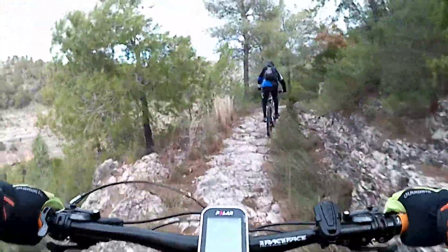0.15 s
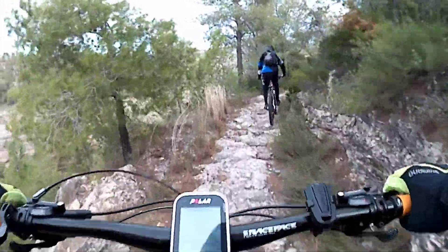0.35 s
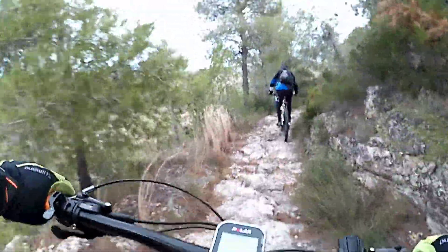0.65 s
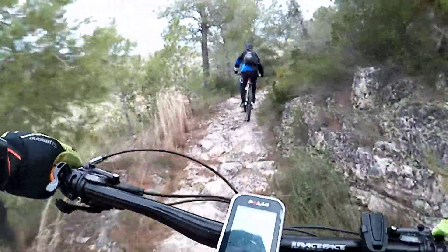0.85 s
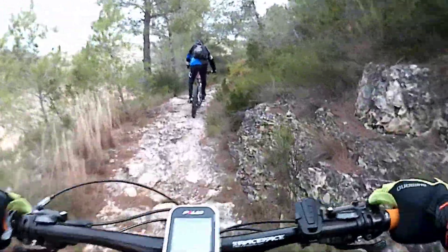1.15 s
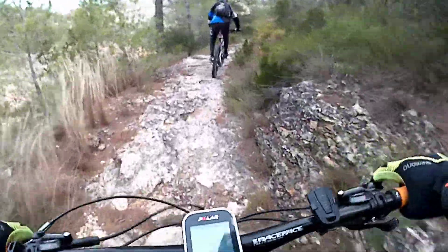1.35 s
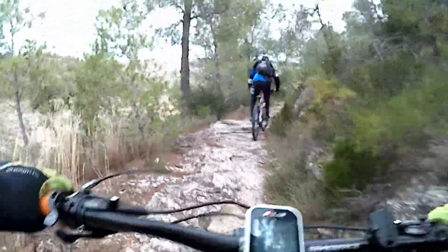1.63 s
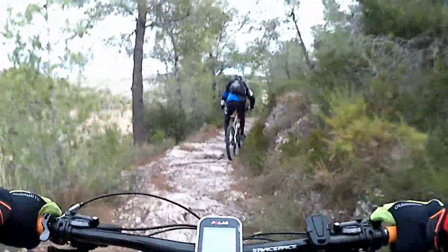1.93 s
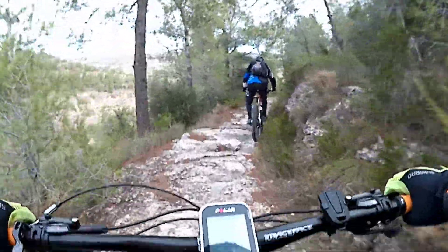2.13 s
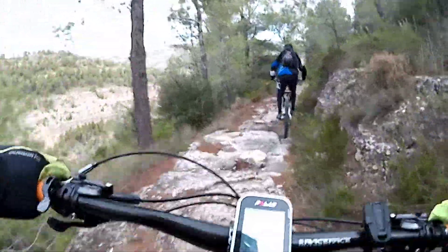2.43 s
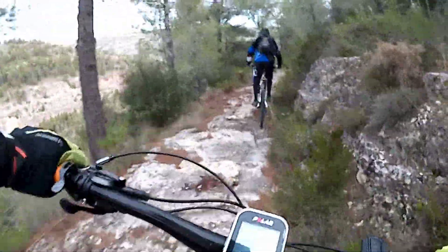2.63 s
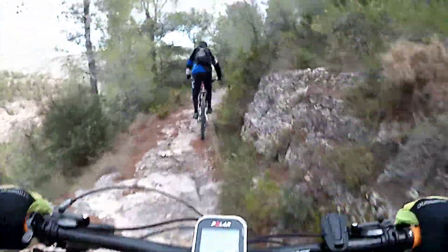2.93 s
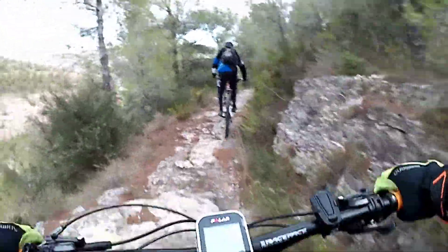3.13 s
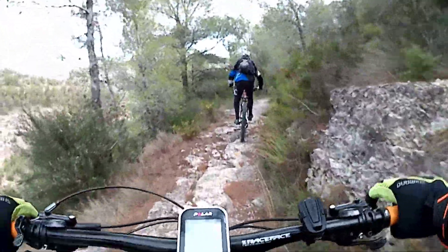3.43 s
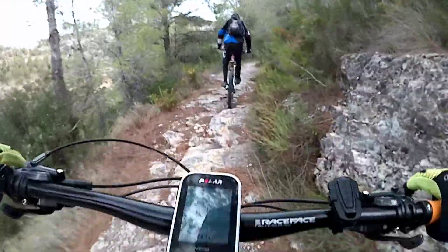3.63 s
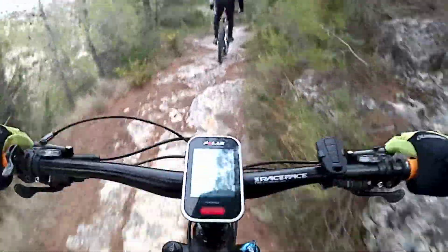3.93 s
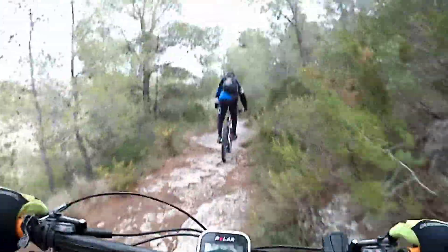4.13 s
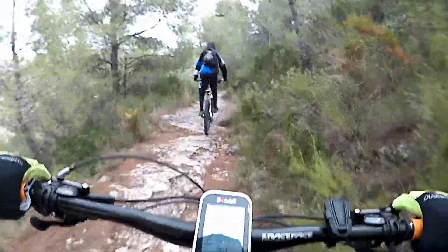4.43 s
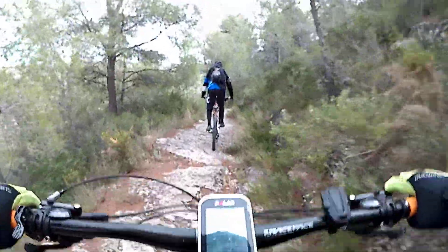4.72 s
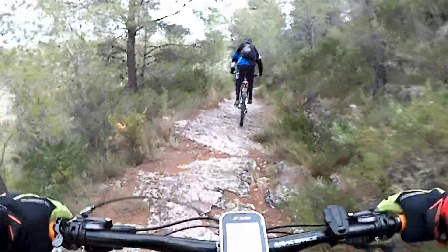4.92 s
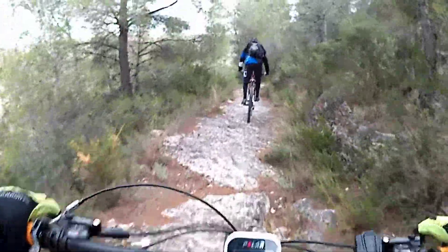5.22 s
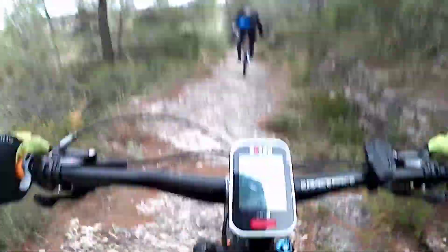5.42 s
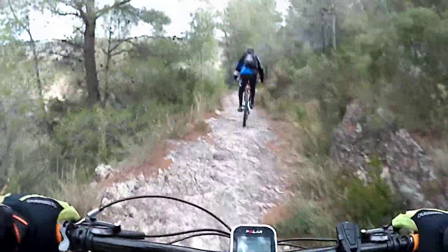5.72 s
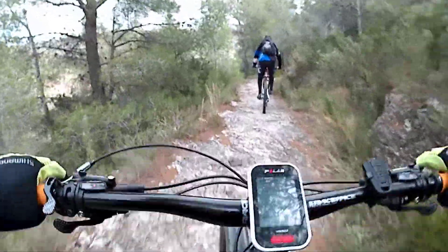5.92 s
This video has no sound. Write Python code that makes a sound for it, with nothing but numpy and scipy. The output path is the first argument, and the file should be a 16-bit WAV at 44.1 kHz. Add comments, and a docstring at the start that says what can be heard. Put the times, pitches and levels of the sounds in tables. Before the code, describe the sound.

A mountain bike rolls along a rocky trail outdoors, heard close up from a muffled microphone on the rider's chest. Rocks knock against the bike in quick, uneven succession, some blows ringing with a hollow note. Deep thumps jolt the microphone, and the chain and cables slap and rattle in short bursts. Underneath, the tyres crunch over grit and wind rumbles throughout.

```python
"""Rocks knock on a mountain bike rolling down a trail, heard from a camera on the rider's chest.
Each blow chatters and rings the frame; hollow notes sound alone or on a knock. Ground jolts shove
the camera into deep thumps, and the hardest overload it. Chain and cables slap and rattle in bursts.
Underneath, knobby tyres crunch over grit and hum on rock, and wind rumbles on the microphone."""
import sys
import numpy as np
from scipy import signal
from scipy.fft import rfft, irfft, next_fast_len
from scipy.io import wavfile
from scipy.ndimage import uniform_filter1d

SR = 44100
rng = np.random.default_rng(int(sys.argv[2]) if len(sys.argv) > 2 else 0)


def wav_out(sig):
    """Save sig, one row per channel (or a flat mono array), as 16-bit PCM at SR to the path in sys.argv[1]."""
    wavfile.write(sys.argv[1], SR, np.round(np.clip(np.atleast_2d(sig).T, -1, 1) * 32767).astype(np.int16))


N = 267554
TIME = np.arange(N) / SR
GRIT_REF_DB = -38


def undb(db):
    """Decibels to gain."""
    return 10 ** (np.asarray(db) / 20)


def unit(x):
    """Scale to rms 1."""
    return x / np.sqrt(np.mean(x ** 2))


def add(track, at_s, sound):
    """Mix a sound into the track."""
    start = max(int(at_s * SR), 0)
    part = sound[:max(N - start, 0)]
    track[start:start + len(part)] += part


def curve(points):
    """Interpolate (t/s, value) points to every sample."""
    return np.interp(TIME, *np.transpose(points))


def walk(rate_hz):
    """Smoothed random steps, spread near 1."""
    hold = int(SR / rate_hz)
    steps = rng.standard_normal(2048)[np.arange(N) // hold % 2048]
    return 1.3 * uniform_filter1d(uniform_filter1d(steps, hold), hold)


def colour(x, spectrum):
    """Shape by (f/Hz, level/dB) points, cut outside them; rms 1."""
    hz, db = np.transpose(spectrum)
    size = next_fast_len(N)
    bins_hz = np.maximum(np.fft.rfftfreq(size, 1 / SR), 1)
    gain = undb(np.interp(np.log(bins_hz), np.log(hz), db, left=-90, right=-90))
    return unit(irfft(rfft(x, size) * gain, size)[:N])


def resonate(x, modes):
    """Ring damped modes, band-limited to their range."""
    ringing = sum((-1) ** k * undb(db) * signal.lfilter(*signal.iirpeak(hz, hz / width_hz, fs=SR), x)
                  for k, (hz, width_hz, db) in enumerate(modes))
    edges_hz = [max(modes[0][0] - modes[0][1], 20), modes[-1][0] + modes[-1][1]]
    return signal.lfilter(*signal.butter(2, edges_hz, "bandpass", fs=SR), ringing)


def ring_each(forces, modes, spread=0.1):
    """Ring the modes once per blow; the place struck shifts their pitch."""
    tunings = np.exp(np.clip(spread * rng.standard_normal((len(forces), len(modes))), -.3, .3))
    return np.array([resonate(force, [(hz * k, width, db) for (hz, width, db), k in zip(modes, tuning)])
                     for force, tuning in zip(forces, tunings)])


def set_attack(x, db):
    """Set each blow's rms level over its first 12 ms."""
    head = x[..., :int(.012 * SR)]
    return x * undb(db) / np.sqrt(np.mean(head ** 2, axis=-1, keepdims=True))


# Modes of bar, frame and camera case: f/Hz, width/Hz, level/dB
THUD_MODES = [(98, 33, 0), (234, 197, -4.5), (300.6, 129.5, -2)]
BODY_MODES = [(484, 106, -0.5), (691, 40, 2.5), (922, 320, 2.5), (1233, 240, -7)]
CLACK_MODES = [(1589, 450, -2), (1876, 113, 3.5), (2043, 527, -3.5)]
TICK_MODES = [(2456, 350, 8), (3453, 570, 2.5), (4050, 32, -14)]
# Rock blows: t/s, level/dB, ring f/Hz, relative thud/dB, relative clatter/dB
ROCK_BLOWS = [(0.025, -29, 1080, -6, 0.5), (0.0727, -26, 925, -31, -2), (0.1028, -27.5, 1100, -24, -2.5),
              (0.1983, -26, 840, 5, -5), (0.2313, -22, 696, -2, -12), (0.2612, -17, 1280, 0, -3),
              (0.3098, -20.5, 1140, -30, -4), (0.4956, -21, 790, 4, -7), (0.5692, -18, 1010, -10, -2.5),
              (0.605, -26.5, 870, -15, -6), (0.7618, -20.5, 1020, -6.5, -0.5),
              (0.902, -21.5, 1050, 0, -4.5), (1.0102, -22, 1110, 2.5, -13), (1.0402, -23, 1504, -8, -6),
              (1.0634, -23, 1075, 6, -0.5), (1.0946, -23.5, 995, -16, -2), (1.1451, -23, 970, -21, -5.5),
              (1.195, -22.5, 500, -2, -8.5), (1.2112, -18, 1140, 4.5, -1.5), (1.2544, -20, 1240, -7, -8),
              (1.3025, -24, 1460, 3, -9), (1.377, -28.5, 1860, -19, -6), (1.398, -28, 900, -18, -3.5),
              (1.4375, -19.5, 720, -37, -11), (1.4761, -22, 582, -2, -7.5), (1.5401, -12.5, 800, -22, -6.5),
              (1.5863, -17.5, 1200, -13, -6.5), (1.7753, -22.5, 1037, 0.5, -2),
              (1.7933, -19, 940, -23, -1.5), (1.923, -30.5, 1720, 3, -11), (1.9429, -20, 1124, -9, -35),
              (2.0247, -20, 860, -3, -9.5), (2.161, -18, 1230, -16, -20), (2.2179, -15, 790, -5.5, -8),
              (2.3019, -24, 557, 5, -7.5), (2.3336, -30, 1020, -12, -0.5), (2.3699, -26, 1170, -29, -14),
              (2.4306, -9, 1230, -13, -6.5), (2.4801, -20, 543, -4, -10), (2.6875, -25, 720, -14, -46),
              (2.9595, -21, 1050, -4, -5.5), (3.062, -21.5, 660, 5, -1.5), (3.0675, -15.5, 900, -4.5, -2),
              (3.117, -32.5, 1210, -1, 0.5), (3.2204, -14.5, 1200, 0, -5), (3.24, -22.5, 1140, -22, -1),
              (3.358, -32.5, 1110, 12.5, -11), (3.4223, -20.5, 840, -8, -1), (3.4746, -25, 1084, -4, -4),
              (3.631, -29.5, 890, -9, -10), (3.6801, -25, 1716, 9, -4.5), (3.713, -22, 920, -3, -9),
              (3.728, -28.5, 970, 9, 1), (3.741, -22.5, 660, 11, -10), (3.757, -26, 800, 7, -18),
              (3.8093, -25, 720, -18, -8), (3.918, -20, 870, -9, -22), (4.0054, -16.5, 782, 2, -5),
              (4.0842, -20, 630, -10.5, -0.5), (4.1334, -20, 1480, -12, 0), (4.18, -27, 1320, 3.5, -2),
              (4.2612, -14, 940, -5.5, -8), (4.2632, -16, 1690, -16.5, -2.5), (4.4121, -16, 740, 0, -3),
              (4.6135, -19.5, 1110, -3, -2.5), (4.6629, -28, 1000, 6.5, -3.5), (4.803, -26, 1030, 3, -6.5),
              (4.8835, -26, 1050, -4, 0.5), (4.9375, -18.5, 1510, -18, -6.5), (5.1576, -21, 946, 3, -3),
              (5.1851, -20.5, 502, -18, -9.5), (5.2285, -21, 1020, 3.5, -2.5),
              (5.2733, -19.5, 870, -12, -12), (5.291, -32, 1070, -9, 1), (5.3099, -21.5, 920, -3, -22),
              (5.4444, -19.5, 1400, 9.5, 0.5), (5.51, -28.5, 1150, -6, -7), (5.6379, -19.5, 1204, -2, -1),
              (5.705, -29, 1076, 12, -9), (5.79, -30, 850, 6.5, -4.5), (5.9432, -19, 1080, -6, -4.5),
              (6.0067, -26, 1110, 9, -3), (6.0549, -20.5, 1090, -21, 0.5)]


def knocks(rows, grit_db, rise_s=0.00024, chatter=0.87, tail_db=-23, tail_t60_s=0.11):
    """Hard contacts build, chatter, ring the bike and leave a faint rattle."""
    times_s, db, hz, thud_db, clatter_db = np.transpose(rows)[:, :, None]
    excess_db = np.interp(times_s, TIME, grit_db) - GRIT_REF_DB
    t60_s = 0.02 * (1050 / hz) ** 0.15 * undb(excess_db)  # longer on low notes and in loud grit
    t = TIME[:SR // 10]
    grain, size, scrape = rng.standard_normal((len(rows), 3, len(t))).transpose(1, 0, 2)
    rise = 1 - np.exp(-t / rise_s)
    fade = undb(-60 * t / np.maximum(t60_s, .004))
    tail = undb(tail_db - 60 * t / tail_t60_s)
    contact = grain * np.exp(chatter * size)
    force = rise * (contact * fade + scrape * tail)
    first_touch = (t == 0) * np.sqrt(np.sum(force ** 2, axis=1, keepdims=True))
    note = set_attack(np.sin(2 * np.pi * hz * t) * rise * fade, 0)
    frame = set_attack(ring_each(force + first_touch, BODY_MODES), 0)
    note_share = np.clip(0.49 - 0.05 * (db + 22), 0, 1)  # softer blows ring more purely
    body = set_attack(np.sqrt(note_share) * note + np.sqrt(1 - note_share) * frame, db + 1)
    thud = set_attack(resonate(force + undb(2.5) * first_touch, THUD_MODES), db + thud_db - 1)
    clack = set_attack(ring_each(force, CLACK_MODES), db + clatter_db)
    tick = set_attack(ring_each(force, TICK_MODES), db + clatter_db - 8)
    out = np.zeros(N)
    for at_s, blow in zip(times_s[:, 0], body + thud + clack + tick):
        add(out, at_s, blow)
    return out


def loose_stones(grit_db, per_s=7, ref_level_db=-39, ring_hz=950, thud_db=-3, clatter_db=-3):
    """Loose stones knock lightly at random, following the level of the grit."""
    count = int(per_s * N / SR)
    times_s = rng.uniform(0, N / SR, count)
    notes_hz = ring_hz * np.exp(0.31 * rng.standard_normal(count))
    excess_db = np.interp(times_s, TIME, grit_db) - GRIT_REF_DB
    rows = [(at_s, db, hz, thud_db, clatter_db)
            for at_s, db, hz in zip(times_s, ref_level_db + excess_db, notes_hz)]
    return knocks(rows, grit_db)


# Hollow ringing notes of the bike, alone or on top of a knock: t/s, level/dB, f/Hz, t60/s
CLONKS = [(1.012, -17, 553, 0.037), (1.03, -23, 1532, 0.14), (1.146, -19, 712, 0.065),
          (1.399, -20.5, 700, 0.03), (1.476, -21, 315, 0.068), (2.0898, -22, 673, 0.026),
          (2.103, -22.5, 782, 0.036), (2.431, -7, 606, 0.02), (2.9605, -18.5, 720, 0.055),
          (3.2205, -12, 488, 0.025), (3.221, -9.5, 780, 0.017), (3.2642, -24, 756, 0.024),
          (3.291, -24.5, 656, 0.015), (3.741, -17, 765, 0.029), (3.8093, -19, 239, 0.026),
          (3.929, -20, 814, 0.041), (4.415, -11, 107, 0.041), (4.9378, -9.5, 252.4, 0.039),
          (4.9385, -16, 712, 0.017), (5.268, -20.5, 311, 0.13), (5.337, -28, 1500, .14)]


def clonks(overtone_ratio=2.06, overtone_db=-16):
    """Tyre, rim or frame rings with one hollow note and a weak overtone."""
    out, t = np.zeros(N), TIME[:SR // 5]
    for at_s, db, hz, t60_s in CLONKS:
        phase = 2 * np.pi * hz * t
        swell = 1 - np.exp(-t * hz)
        fade = undb(-60 * t / t60_s)
        note = np.sin(phase) * fade + undb(overtone_db) * np.sin(overtone_ratio * phase) * fade ** 2
        add(out, at_s, set_attack(note * swell, db))
    return out


# Camera shoves: t/s, peak before leakage/dB, length/s
JOLTS = [(0.066, -6.5, 0.012), (0.111, -4, 0.0074), (0.238, 1.5, 0.016), (0.289, -4.5, 0.0094),
         (0.393, -1.5, 0.019), (0.461, -1.5, 0.015), (0.557, -3.5, 0.0079), (0.613, -0.5, 0.01),
         (1.099, -6, 0.0043), (1.109, -3, 0.0078), (1.187, 2, 0.012), (1.254, 1, 0.012),
         (1.439, 1.5, 0.0078), (1.534, 0, 0.0099), (1.567, 0, 0.015), (1.69, 1.5, 0.012),
         (1.779, -3, 0.0051), (1.792, 15.5, 0.002), (1.94, 5.5, 0.011), (2.227, 3, 0.005),
         (2.293, 2, 0.012), (2.343, 0.5, 0.0086), (2.423, 3, 0.0036), (2.509, 0, 0.0087),
         (2.742, 0.5, 0.021), (2.852, 1, 0.016), (2.946, 6, 0.012), (3.035, 1.5, 0.0074),
         (3.127, -1, 0.0084), (3.221, -0.5, 0.0061), (3.366, -2, 0.0061), (3.406, -5, 0.012),
         (3.483, 2, 0.011), (3.612, -2, 0.016), (3.683, 0, 0.0045), (3.718, -4, 0.0076),
         (3.748, 6.5, 0.002), (3.754, -9.5, 0.0026), (3.885, -9, 0.003), (4.014, 2, 0.0026),
         (4.084, -2.5, 0.016), (4.152, -0.5, 0.0068), (4.239, 0, 0.019), (4.329, 5, 0.013),
         (4.42, 0, 0.0055), (4.44, -2.5, 0.0082), (4.6, -2, 0.014), (4.673, 0.5, 0.011), (4.889, 0, 0.0076),
         (5.308, 3.5, 0.0073), (5.331, 2.5, 0.0077), (5.465, -0.5, 0.0073), (5.505, 5.5, 0.011),
         (5.634, -0.5, 0.0043), (5.713, 4.5, 0.012), (5.831, -1.5, 0.01), (6.011, -4.5, 0.0082),
         (6.048, -0.5, 0.012)]


def jolts(build_share=0.49, release_share=0.25, leak_hz=13):
    """The camera is shoved to and fro; each pressure pulse leaks from the case and swings back."""
    pressure = np.zeros(N)
    t = np.arange(-SR // 16, SR // 16) / SR
    for k, (at_s, db, length_s) in enumerate(JOLTS):
        width_s = length_s * np.where(t < 0, build_share, release_share)
        pulse = undb(db) / (1 + (t / width_s) ** 2)
        add(pressure, at_s + t[0], (-1) ** k * pulse)
    return signal.lfilter(*signal.butter(1, leak_hz, "highpass", fs=SR), pressure)


# Chain slaps: t/s, length/s, level/dB
CHAIN_SLAPS = [(0.228, 0.11, -49), (0.315, 0.022, -38), (0.39, 0.013, -40.5), (0.45, 0.11, -46.5),
               (0.922, 0.026, -42.5), (1.026, 0.058, -43), (1.156, 0.006, -31), (1.233, 0.056, -37),
               (1.482, 0.021, -36.5), (2.203, 0.07, -50), (2.318, 0.031, -50), (3.049, 0.032, -35.5),
               (3.348, 0.011, -43.5), (3.406, 0.066, -41.5), (3.613, 0.014, -39.5), (3.723, 0.019, -36),
               (4.018, 0.023, -36.5), (4.122, 0.045, -39.5), (4.372, 0.024, -42.5), (4.83, 0.096, -43),
               (5.171, 0.071, -40), (5.274, 0.049, -48), (5.336, 0.033, -47), (5.503, 0.011, -40),
               (5.98, 0.063, -48)]
# Chain stay modes: f/Hz, width/Hz, level/dB
STAY_MODES = [(1383, 37, 1.5), (1830, 230, 2)]


def chain(clicks_per_s=420, range_db=12, link_t60_s=0.066, low_hz=2300, high_hz=3900, stay_db=4.5):
    """The chain whips the frame: each link clicks with its own note and rings the stay."""
    out, t = np.zeros(N), TIME[:SR // 30]
    fade = undb(-60 * t / link_t60_s)
    for at_s, length_s, db in CHAIN_SLAPS:
        links, taps = np.zeros((2, SR // 4))
        count = int(clicks_per_s * length_s)
        for k, (jitter, pitch, size) in enumerate(rng.random((count, 3))):
            start = int((k + jitter) / count * length_s * SR)
            gain = undb(range_db * size)
            hz = low_hz * (high_hz / low_hz) ** pitch
            links[start:start + len(t)] += gain * np.sin(2 * np.pi * hz * t) * fade
            taps[start] += gain
        burst = unit(links) + undb(stay_db) * unit(resonate(taps, STAY_MODES))
        add(out, at_s, burst * undb(db) * np.sqrt(length_s * SR / len(burst)))
    return out


def rattle(blows, hold_s=0.003, clack_db=-18, tick_db=-22):
    """Chain and cables jingle unevenly for a moment after the frame is shaken."""
    pole = np.exp(-1 / (hold_s * SR))
    power = signal.lfilter([1 - pole], [1, -pole], blows ** 2 + 1e-12)
    shaking = np.tanh(np.sqrt(power))  # the links have limited play
    links = rng.standard_normal(N) * undb(5 * walk(260))
    clack = unit(resonate(links, CLACK_MODES)) * undb(clack_db)
    tick = unit(resonate(links, TICK_MODES)) * undb(tick_db)
    return shaking * (clack + tick)


# Grit spectrum: f/Hz, relative level/dB
GRIT_SPECTRUM = [(130, -6.5), (220, 7.5), (400, 8), (520, 4.5), (720, 6.5), (1000, 4), (1550, 4.5),
                 (2000, -7.5), (2600, -8.5), (3600, -27), (4400, -49.5)]


def grit(level_db, stones_per_s=420, range_db=16, snap_s=0.00087, stone_db=-1.5, crunch_db=-3.5):
    """Small stones snap under the tyres, over an uneven crunch of gravel and sand."""
    stones, t = np.zeros(N), TIME[:SR // 100]
    for when, pitch, size, length in rng.random((int(stones_per_s * N / SR), 4)):
        hz = 300 * 10 ** pitch
        snap = np.sin(2 * np.pi * hz * t) * np.exp(-t / (snap_s * (.5 + length)))
        add(stones, when * N / SR, undb(range_db * size ** 3) * snap)
    noise = rng.standard_normal(N)
    coarse = signal.sosfilt(signal.butter(4, 2200, fs=SR, output="sos"), noise)
    fine = signal.sosfilt(signal.butter(4, 2200, "highpass", fs=SR, output="sos"), noise)
    crunch = coarse * undb(2 * walk(30)) + fine * undb(4.5 * walk(25))
    return (undb(level_db + stone_db) * colour(stones, GRIT_SPECTRUM)
            + undb(level_db + crunch_db) * colour(crunch, GRIT_SPECTRUM))


# Tread hum on smoother rock: t/s, level/dB
TREAD_LEVEL = [(0, -38), (1.601, -34.5), (1.901, -42), (2.6, -41.5), (2.81, -31), (2.901, -42),
               (3.449, -35), (4.696, -43.5), (5.05, -37), (6.07, -43.5)]


def tread(knob_hz=298.4, waver=0.05, jitter=0.065, swell_db=5):
    """Tyre knobs slap the rock in quick succession; the hum comes and goes with the contact."""
    hz = knob_hz * (1 + waver * walk(8.2) + jitter * walk(90))
    hum = np.sin(2 * np.pi * np.cumsum(hz) / SR) * undb(swell_db * walk(16))
    return unit(hum) * undb(curve(TREAD_LEVEL))


# Sand under the tyres: t/s, level/dB
SAND_LEVEL = [(0, -51), (0.8, -58), (1.68, -48), (1.85, -57), (2.88, -52), (3.0, -66), (3.3, -64),
              (3.9, -47), (4.3, -62), (4.5, -52), (5.22, -50), (5.4, -60), (6.07, -57)]


def sand(crunch_db=2.5, grain_db=8, band_hz=(2100, 4000)):
    """Fine sand hisses in tiny grains, with an odd louder crunch."""
    flicker_db = crunch_db * walk(35) + grain_db * walk(260)
    grains = rng.standard_normal(N) * undb(flicker_db)
    hiss = signal.sosfilt(signal.butter(2, band_hz, "bandpass", fs=SR, output="sos"), grains)
    return unit(hiss) * undb(curve(SAND_LEVEL))


# Wind spectrum: f/Hz, relative level/dB
WIND_SPECTRUM = [(15, -6.5), (28, -3), (50, -11.5), (100, -21.5), (160, -26.5), (300, -28)]


def wind(grind_db, gust_db=2, follow_db_per_db=0.82, gain_db=3):
    """Air rumbles on the microphone, swelling with the grinding of the tyres."""
    gusts = rng.standard_normal(N) * undb(gust_db * walk(15))
    return colour(gusts, WIND_SPECTRUM) * undb(follow_db_per_db * grind_db + gain_db)


def shock(blows, knee_db, lag_s, span_s=0.03):
    """How hard the bike was hit lag_s earlier, 0 to 1."""
    power = np.abs(uniform_filter1d(blows ** 2, int(span_s * SR)))
    return np.interp(TIME - lag_s, TIME, np.tanh(np.sqrt(power) / undb(knee_db)))


# Base level of the gravel grinding, with brief lulls: t/s, level/dB
GRIT_LEVEL = [(0.0, -31), (0.27, -34), (0.85, -37), (1.05, -32), (1.25, -31.5), (1.83, -35), (2.2, -33.5),
              (2.64, -36.5), (2.86, -34.5), (3.0, -40), (3.15, -36.5), (3.26, -36), (3.55, -38),
              (3.73, -37.5), (4.05, -32), (4.19, -36), (4.3, -46), (4.4, -37.5), (4.76, -39.5), (4.85, -35),
              (5.13, -43.5), (5.16, -33.5), (5.51, -36.5), (6.07, -39)]


def scene(unloaded_db=2, load_db=7.5, dip_db=-4.5):
    """Knocks, thumps and rattle over rolling tyres and wind, in open air."""
    grit_db = curve(GRIT_LEVEL)
    rocks = knocks(ROCK_BLOWS, grit_db)
    blows = rocks + loose_stones(grit_db)
    thumps = jolts()
    # Each blow presses the tyres into the grit.
    load = uniform_filter1d(shock(rocks, knee_db=-19, lag_s=0.0032), int(0.0059 * SR))
    grind_db = grit_db + unloaded_db + load_db * load
    # Gravel noise and hum dip briefly after each heavy thump.
    dip = shock(thumps, knee_db=-4.5, lag_s=0.038) ** 2 * (1 - load)
    tyres = (grit(grind_db) + tread() + sand()) * undb(dip_db * dip)
    return (blows + clonks() + thumps + chain() + rattle(blows) + tyres + wind(grind_db))[None]


def record(dry, case_hz=4250, full_scale=0.715, rolloff_hz=11000, dip_hz=5800, top_hz=16500):
    """The closed case muffles the treble. Peaks clip; a treble dip and roll-off soften the clicks."""
    muffled = signal.sosfilt(signal.ellip(9, .3, 70, case_hz, fs=SR, output="sos"), dry)
    clipped = np.clip(muffled, -full_scale, full_scale)
    rounded = signal.lfilter(*signal.butter(1, rolloff_hz, fs=SR), clipped)
    dipped = rounded - .45 * signal.lfilter(*signal.iirpeak(dip_hz, 2.5, fs=SR), rounded)
    return signal.sosfilt(signal.ellip(8, .2, 70, top_hz, fs=SR, output="sos"), dipped)


dry = scene()
out = record(dry)
wav_out(out)
```